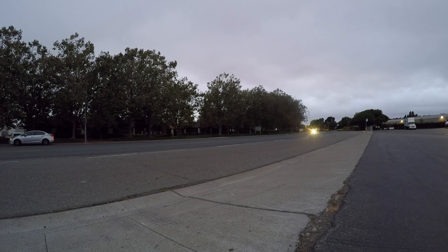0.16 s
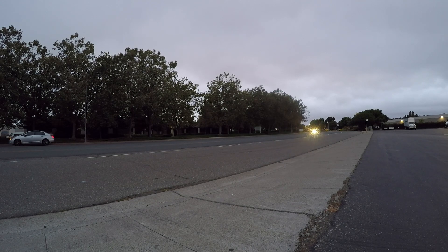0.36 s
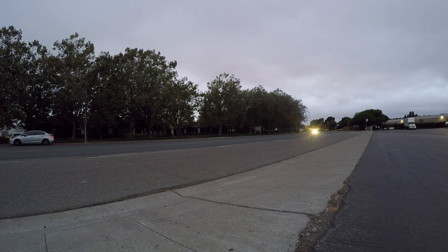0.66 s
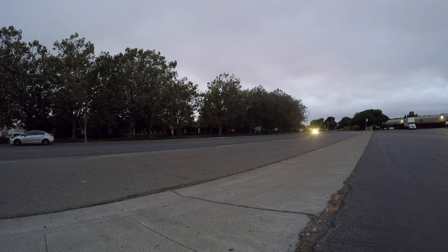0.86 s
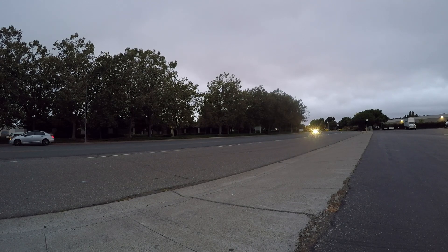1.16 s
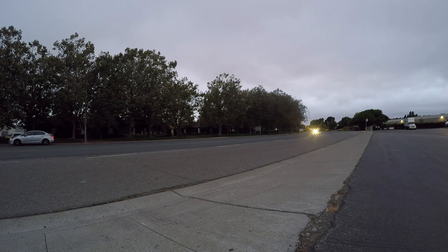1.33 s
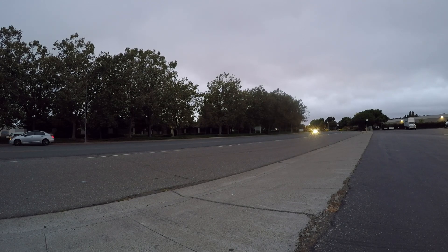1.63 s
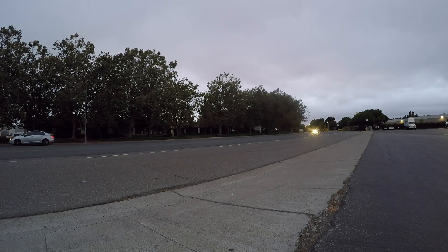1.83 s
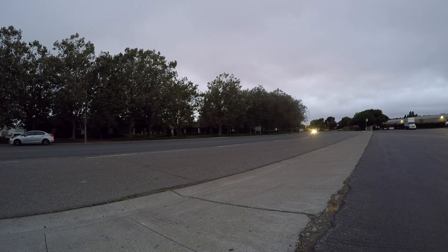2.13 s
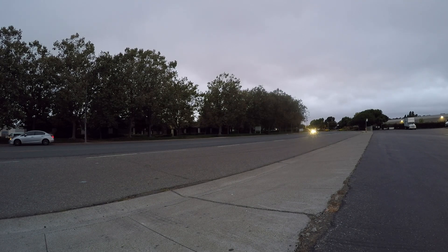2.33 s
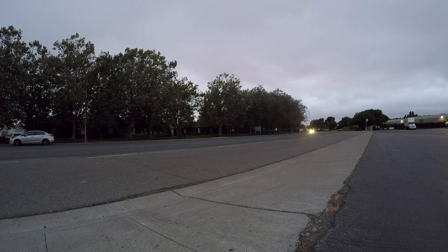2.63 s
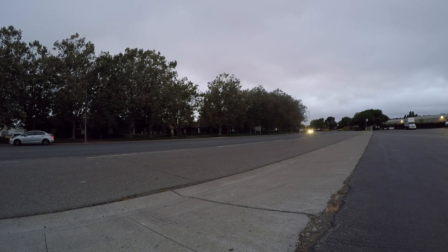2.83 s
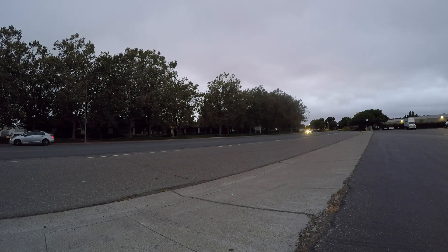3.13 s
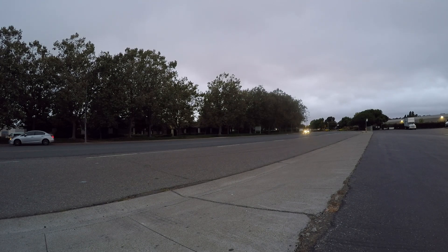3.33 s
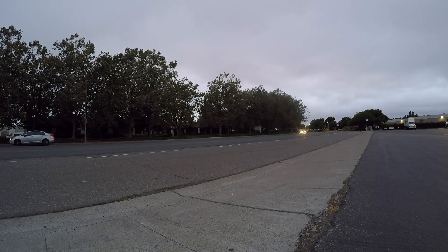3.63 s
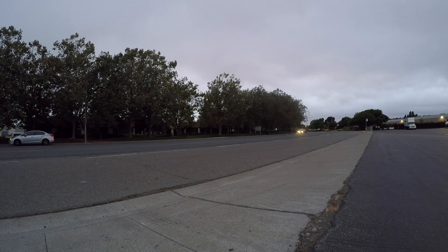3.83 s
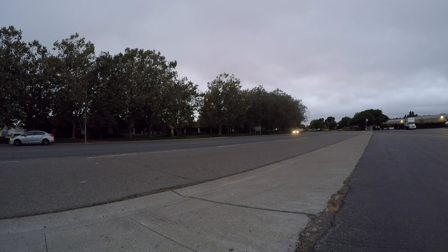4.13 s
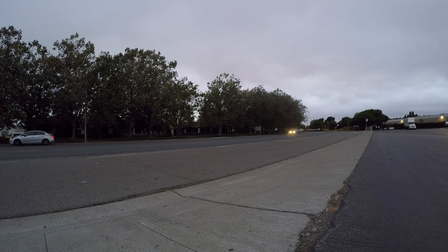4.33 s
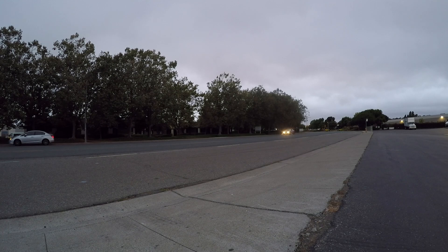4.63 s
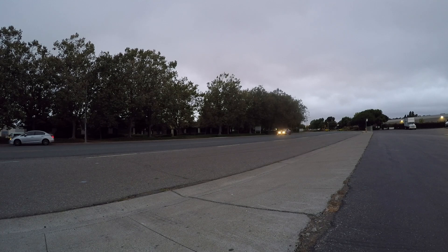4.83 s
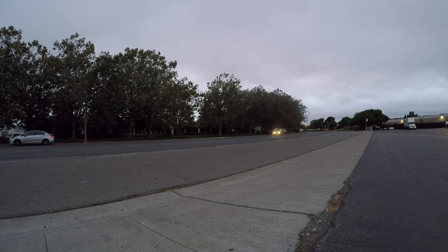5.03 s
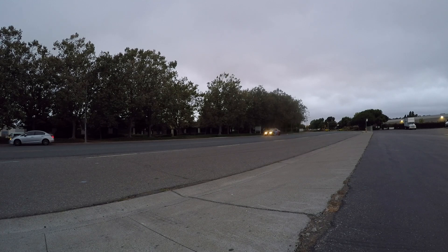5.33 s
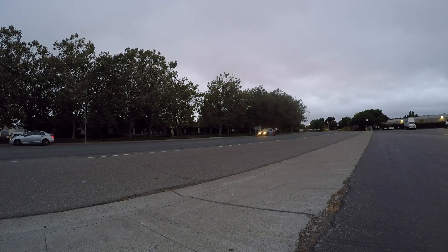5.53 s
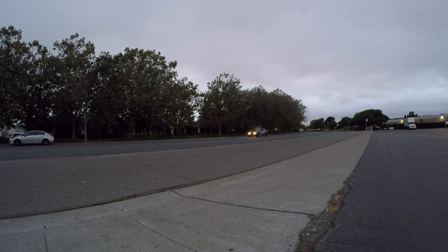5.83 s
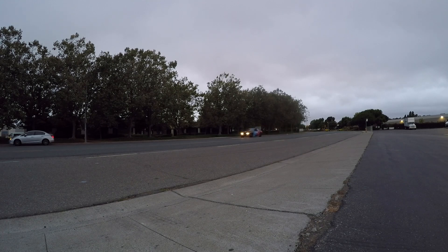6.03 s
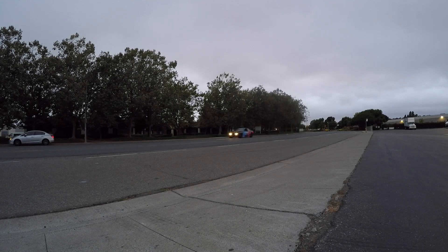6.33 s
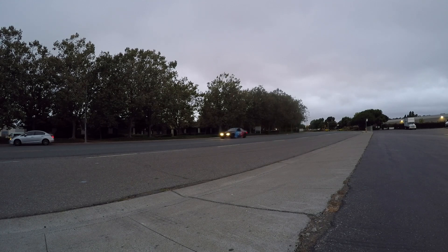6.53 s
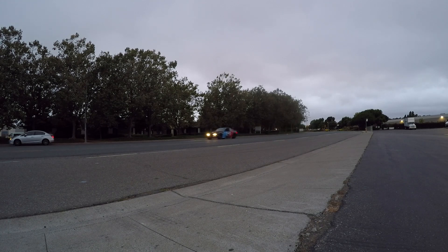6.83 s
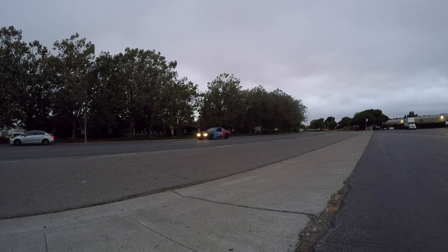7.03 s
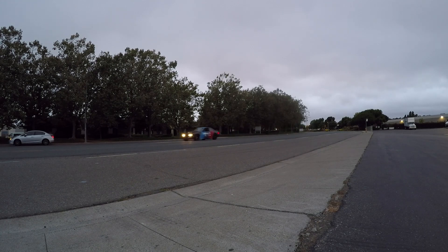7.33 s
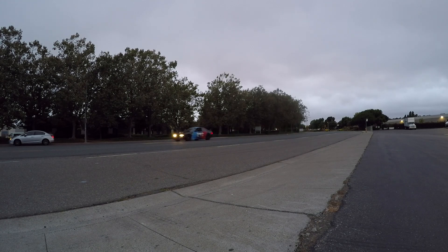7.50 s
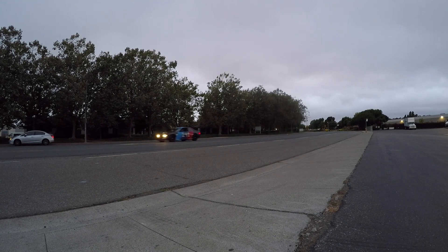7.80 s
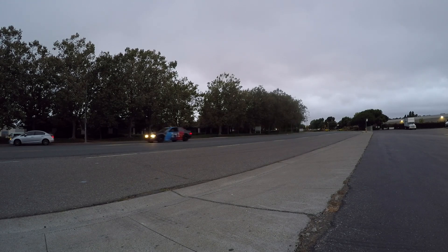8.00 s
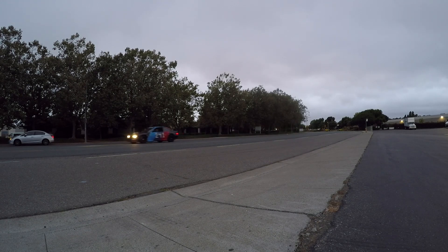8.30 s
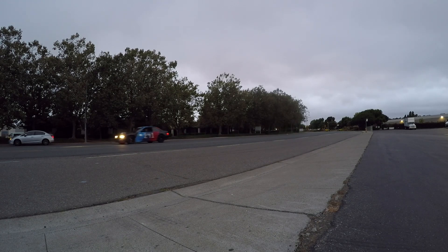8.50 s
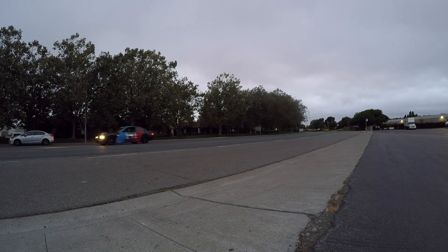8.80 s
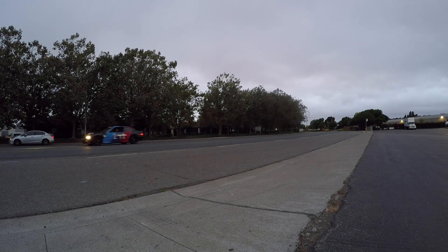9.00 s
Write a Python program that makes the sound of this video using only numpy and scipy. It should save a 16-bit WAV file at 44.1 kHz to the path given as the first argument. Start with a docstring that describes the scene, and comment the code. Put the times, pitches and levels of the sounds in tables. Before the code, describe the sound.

A single outdoor microphone, shaken by low wind gusts, hears a V8 coming nearer while slowing down. At first it is a faint falling hum; a quick rev jumps out, followed by a raspy, hissing overrun. Dry exhaust pops rattle, the engine drops to a lumpy throb, the brake chirps very briefly, and two gruff blips with puffs of gas follow, with a third starting at the end. Far traffic and leaves stay very faint.

```python
"""An eight-cylinder car with a loud exhaust rolls up an open road on the overrun, blips for a lower gear,
crackles, slows further and blips again near idle. The exhaust is a set of tones locked to engine speed plus
noise gated by the firings; pops and puffs ring the pipe, and faint gear and belt whines follow the engine.
The brake squeaks in gliding sine tones: a falling chirp, a held whistle, later a faint peep.
Coloured noise makes the wind rumbling on the microphone and the far traffic and leaves."""
import sys
import numpy as np
from scipy import signal
from scipy.fft import rfft, irfft, next_fast_len
from scipy.io import wavfile

SR = 44100
rng = np.random.default_rng(int(sys.argv[2]) if len(sys.argv) > 2 else 0)


def wav_out(sig):
    """Save sig, one row per channel (or a flat mono array), as 16-bit PCM at SR to the path in sys.argv[1]."""
    wavfile.write(sys.argv[1], SR, np.round(np.clip(np.atleast_2d(sig).T, -1, 1) * 32767).astype(np.int16))


N = 403956


def from_db(db):
    """Decibels to gain."""
    return 10 ** (np.asarray(db) / 20)


def rms_one(x):
    """Scale to rms 1."""
    return x / np.sqrt(np.mean(x ** 2) + 1e-20)


def in_time(rows):
    """Table columns as curves over every sample; the first column is the time in seconds."""
    s, *columns = np.transpose(rows)
    return [np.interp(np.arange(N) / SR, s, column) for column in columns]


def drift(rate_hz):
    """Slow random wander of spread 1, moving about rate_hz times a second."""
    step = 40  # samples between the points of the slow curve
    warm_up = 2000
    r = np.exp(-2 * np.pi * rate_hz * step / SR)
    noise = rng.standard_normal(N // step + 2 + warm_up)
    slow = signal.lfilter([1], [1, -2 * r, r * r], noise)[warm_up:]
    return np.interp(np.arange(N) / step, np.arange(len(slow)), rms_one(slow))


def colour(x, spectrum):
    """Shape a noise by (pitch_hz, level_db) points on a log frequency axis; rms 1."""
    hz, db = np.transpose(spectrum)
    size = next_fast_len(N)
    log_hz = np.log(np.arange(size // 2 + 1) * SR / size + 1)
    gain = from_db(np.interp(log_hz, np.log(hz), db, left=-90, right=-90))
    return rms_one(irfft(rfft(x, size) * gain, size)[:N])


def resonance(x, hz, width_hz):
    """Two-pole resonance with gain 1 on top."""
    r = np.exp(-np.pi * width_hz / SR)
    zeros = np.array([1, 0, -1]) * (1 - r * r) / 2
    poles = [1, -2 * r * np.cos(2 * np.pi * hz / SR), r * r]
    return signal.lfilter(zeros, poles, x + 1e-18)


def double_resonance(x, hz, width_hz):
    """The same resonance twice in a row, for steeper skirts."""
    return resonance(resonance(x, hz, width_hz), hz, width_hz)


def highpass(x, order, hz):
    """High-pass run both ways, so that it shifts no phase."""
    return signal.sosfiltfilt(signal.butter(order, hz, "high", fs=SR, output="sos"), x)


# engine slowing and revving: time_s, cycle_hz (four-stroke cycles; eight firings in each)
ENGINE_SPEED = [(0, 32.1), (0.7, 30.62), (1.5, 27.9), (2.28, 25.5), (2.98, 24.2), (3.09, 23.9),
                (3.27, 32.2), (3.42, 37.3), (3.62, 34.06), (3.85, 28.5), (4.17, 28.6), (4.56, 26.0),
                (5.13, 22.61), (5.5, 20.4), (6.27, 16.1), (6.8, 13.4), (7.4, 11.2), (8.0, 8.55), (8.2, 9.1),
                (8.47, 9.85), (8.85, 9.4), (9.16, 8.9)]


def engine_speed():
    """Cycle rate in Hz, and its running sum in cycles, to which every engine sound is locked."""
    cycle_hz, = in_time(ENGINE_SPEED)
    return cycle_hz, np.cumsum(cycle_hz) / SR


# engine surges (throttle blips, and at 3.4 s the engine dragged by the clutch):
# start_s, noise_peak_s, tone_cut_s, noise_gone_s, firing_tone_db, rasp_lift_db, hiss_lift_db,
# hiss_lag (power of the opening, no unit), tailpipe_bark_db
ENGINE_SURGES = [(3.029, 3.298, 3.34, 3.594, -15.5, 12.5, 17, 4.0, -47),
                 (3.408, 3.545, 3.9, 3.69, -33.5, 9.5, 7.5, 1.2, -51),
                 (4.655, 5.003, 5.5, 5.05, -32, 3.5, 2.5, 0.81, -38.5),
                 (8.007, 8.08, 8.1, 8.33, -17.5, 12, 5.5, 1.8, -32),
                 (8.313, 8.466, 8.68, 8.6, -18, 8.5, 4.5, 1.7, -36),
                 (8.936, 9.098, 12.26, 9.7, -33, 10.5, 6.5, 0.9, -41)]
TONE_SWELL_DB = 44   # the firing tone grows this much while a surge opens
TONE_CUT_DB_PER_S = 233   # and drops away after the cut
UPPER_LATE_DB = 12   # the upper multiples of the firing tone start this much weaker still


def surges():
    """Per surge the opening 0-1 as the noise follows it; overall dB of the firing tone and its upper multiples."""
    t = np.arange(N) / SR
    start, peaks, cut, gone, tone_db = np.array(ENGINE_SURGES)[:, :5].T[..., None]
    rise = np.clip((t - start) / (peaks - start), 0, 1)
    fall = np.clip((gone - t) / (gone - peaks), 0, 1)
    opening = np.minimum(rise, fall)
    tone_db = tone_db - TONE_SWELL_DB * (1 - np.sqrt(rise)) ** 2
    tone_db = tone_db - TONE_CUT_DB_PER_S * np.maximum(t - cut, 0)
    tone_db = np.where(rise > 0, tone_db, -90)
    upper_db = tone_db - UPPER_LATE_DB * (1 - rise) ** 2
    return opening, tone_db.max(axis=0), upper_db.max(axis=0)


# roughness of the firing: time_s, roughness (0-1)
FIRING_ROUGHNESS = [(2.9, .2), (3.05, .17), (3.4, .2), (3.9, .1), (5.1, .09), (5.3, .4), (5.95, .35),
                    (6.2, .2), (7.15, .27), (7.5, .4), (8.0, .25), (8.3, .12), (9.16, .17)]
# tones during the surges: cycle_multiple, level_db (re the firing tone)
SURGE_TONES = [(6, -18), (7, -12), (8, 0.5), (9, -17), (12, -19), (16, -8), (24, -11), (28, -18), (32, -16)]
# tones on the overrun: cycle_multiple, level_db (re the tone level)
SHUT_TONES = [(6, 0), (7, -8), (8, 1.5), (9, -11.5), (10, 0.5), (11, -13.5), (12, -7.5), (14, 3.5),
              (16, -5.5), (18, -6), (20, -3.5), (22, -4), (24, -7.5), (28, -14), (32, -25)]
# what the silencer passes of an overrun tone: pitch_hz, gain_db
SILENCER_PASS = [(90, -36.5), (145, -0.5), (190, 2), (220, -5), (255, 0.5), (285, -6), (315, -3),
                 (350, -9.5), (400, -3.5), (480, -7.5), (600, -11), (800, -14)]
# second and third multiples of the firing tone as engine speed changes: cycle_hz, second_db, third_db
UPPER_MULTIPLES = [(8.8, 12.5, 9), (11.7, 9, 2), (12.37, 9.5, 15), (14.3, 12.5, 10), (15.55, 12, 14),
                   (17.6, 3.5, -2), (24, -6.5, -14), (38, 2, -7)]
# shifting balance of the overrun tones: time_s, odd_db, even_db (even: multiples 14, 18 and 20)
TONE_BALANCE = [(3.0, -3, -0.5), (3.5, 3.5, -2), (4.0, 5, -1.5), (4.25, 1, -0.5), (4.5, -5, -3),
                (4.85, -7, -4.5), (5.3, 5, -8), (6.0, 1, -1.5), (6.4, 5, -11), (6.8, 11.5, -3.5),
                (9.16, -5, 3.5)]
# surge tones above the second firing multiple fade as the cycle rate lies below EDGE_FULL_HZ
EDGE_DB_PER_HZ, EDGE_FULL_HZ = 0.5, 33


def pipe_tones(cycle_hz, turns, overrun_db, firing_db, upper_db):
    """Multiples of the cycle rate; rough firing makes each waver in level and phase."""
    rough, = in_time(FIRING_ROUGHNESS)
    pass_hz, pass_db = np.transpose(SILENCER_PASS)
    surge_levels = {round(k): db for k, db in SURGE_TONES}
    upper = np.transpose(UPPER_MULTIPLES)
    edge_db = EDGE_DB_PER_HZ * np.minimum(cycle_hz - EDGE_FULL_HZ, 0)
    odd_db, even_db = in_time(TONE_BALANCE)
    shared_wander = rough * 1.2 * drift(10)   # phase of the firing tone, scaled to each multiple
    out = 0
    for k, db in SHUT_TONES:
        k = round(k)
        passed_db = np.interp(np.log(k * cycle_hz), np.log(pass_hz), pass_db)
        gain = from_db(overrun_db + db + passed_db)
        if k in (16, 24):
            gain = gain * from_db(np.interp(cycle_hz, upper[0], upper[k // 8 - 1]))
        gain = gain * from_db(odd_db * (k % 2) + even_db * (k in (14, 18, 20)))
        if k in surge_levels:
            drive_db = upper_db if k > 9 else firing_db
            gain = gain + from_db(drive_db + surge_levels[k] + edge_db * (k > 16))
        phase = 2 * np.pi * k * turns + rough * 1.5 * drift(10) + shared_wander * k / 8
        # multiples of the firing tone start in phase, the rest anywhere
        start = 2 * np.pi * rng.random() * (k % 8 > 0)
        out = out + gain * from_db(rough * 9.0 * drift(8)) * np.sqrt(2) * np.cos(phase + start)
    return out


# exhaust with the throttle shut, before surges and shaping: time_s, tones_db, roar_db, rasp_db, hiss_db
SHUT_EXHAUST = [(0, -43.5, -36.5, -40.5, -66), (1.2, -41.5, -44, -39, -64.5), (2.4, -40, -37, -40.5, -58),
                (2.75, -39.5, -50, -38.5, -54.5), (3.03, -44, -30, -42.5, -54),
                (3.09, -40, -27, -31, -45.5), (3.6, -21.5, -40, -31.5, -36),
                (3.85, -34.5, -28.5, -30, -41.5), (4.1, -28, -24.5, -30, -42.5),
                (4.4, -28, -29.5, -33.5, -44.5), (5.1, -27, -30, -32.5, -37.5),
                (5.22, -39, -29, -32.5, -44), (5.4, -33, -36, -31, -42), (5.7, -27, -20.5, -30, -42.5),
                (6, -31.5, -32, -34, -43), (6.35, -30, -25, -31.5, -42.5), (6.7, -36, -25.5, -36.5, -45.5),
                (6.92, -29.5, -26.5, -37.5, -46.5), (7.12, -31, -30, -40, -47),
                (7.4, -33.5, -26, -36, -44.5), (7.63, -40, -34.5, -43, -52.5),
                (7.9, -35.5, -28, -36, -45.5), (8.3, -33.5, -30, -36, -48.5), (8.7, -37, -29, -37.5, -48.5),
                (9.16, -35.5, -35.5, -40.5, -53.5)]
ROAR_LIFT = 0.78   # the roar takes this share of the rasp's lift in dB
ROAR_POWER = 1   # power of the opening; 1 makes roar, rasp and bark rise evenly with it
HISS_HOLD = 1.11   # the hiss is full before the opening is, and so holds its top
HISS_FALL = 1.28   # power of the closing


def exhaust_levels(opening):
    """Tone level in dB and the gains of roar, rasp, bark and hiss; each surge lifts the gains."""
    tone_db, roar_db, rasp_db, hiss_db = in_time(SHUT_EXHAUST)
    rasp_lift_db, hiss_lift_db, hiss_lag, bark_db = np.array(ENGINE_SURGES)[:, 5:].T[..., None]
    low_opening = opening ** ROAR_POWER
    low_db = (rasp_lift_db * low_opening).max(axis=0)
    hiss_power = np.where(np.gradient(opening, axis=1) > 0, hiss_lag, HISS_FALL)
    hiss_opening = np.minimum(HISS_HOLD * opening, 1) ** hiss_power
    high_db = (hiss_lift_db * hiss_opening).max(axis=0)
    bark = (from_db(bark_db) * low_opening).sum(axis=0)
    roar = from_db(roar_db + ROAR_LIFT * low_db)
    return tone_db, (roar, from_db(rasp_db + low_db), bark, from_db(hiss_db + high_db))


# tailpipe resonances: pitch_hz, width_hz (of each of two passes), level_db
TAILPIPE_MODES = [(913, 91, 0), (1134, 117, 4)]


def tailpipe_ring(x):
    """Noise ringing in the tailpipe: steep resonances side by side; rms 1."""
    return rms_one(sum(from_db(db) * double_resonance(x, hz, width) for hz, width, db in TAILPIPE_MODES))


# uneven strength of the eight firings in a cycle: level_db
CYLINDER_STRENGTH = [0, -4, -1, -6, 1, -3, -5, -2]
# spectra of the low roar, the middle rasp and the high hiss: pitch_hz, level_db (per Hz)
ROAR_COLOUR = [(90, 4), (125, -23.5), (160, 6), (200, 6.5), (270, -1.5), (310, 0.5), (350, -4), (450, -9.5),
               (700, -12)]
RASP_COLOUR = [(240, -44), (400, 6), (494, -1), (605, -3.5), (785, 0), (1300, -4), (1550, -14), (3000, -25),
               (3900, -39), (6600, -120)]
HISS_COLOUR = [(1290, -2), (2200, -1.5), (2780, -0.5), (3210, -5), (4020, -6), (5600, -9), (6210, -9),
               (7540, -11.5), (9830, -19.5), (15100, -22.5)]
# changing brightness of the hiss and strength of its narrow whistle:
# time_s, treble_db (gain of the hiss above TREBLE_HZ), whistle_db (re the hiss)
TREBLE_AND_WHISTLE = [(0, 9, -13), (2.9, -5, -9), (3.2, -16, -25), (3.33, -12, -12), (3.55, -40, -16),
                      (4, -20, -9.5), (4.25, -18, -7), (4.35, -16, -11), (4.65, -6, -8), (4.75, -5, -6),
                      (5.1, -5.5, -7), (5.6, -4.5, -14), (6.5, -1.5, -46), (8.05, 2.5, -18),
                      (9.16, 5.5, -32)]
# the rasp's upper part grows duller or brighter over time: time_s, upper_db (gain above RASP_EDGE_HZ)
RASP_BRIGHTNESS = [(3, 2), (6.5, -3), (7.5, 1), (8.2, -7.5), (9.16, -2.5)]
RASP_EDGE_HZ, TREBLE_HZ = 1300, 8500
WHISTLE_HZ, WHISTLE_WIDTH_HZ = 5500, 480
SURGE_DEPTH = 0.17   # the bursts stand further apart during a surge


def exhaust_noise(turns, gains, opening, depth=0.13, sharp=1.17, scatter_db=5.5):
    """Turbulence let out in a burst at each firing, uneven from cylinder to cylinder."""
    roar_gain, rasp_gain, bark_gain, hiss_gain = gains
    treble_db, whistle_db = in_time(TREBLE_AND_WHISTLE)
    rasp_upper_db, = in_time(RASP_BRIGHTNESS)

    # every firing starts a burst that decays until the next
    firing = (8 * turns).astype(int)
    scatter = scatter_db * np.clip(rng.standard_normal(3000), -1.5, 1.5)
    strength_db = np.array(CYLINDER_STRENGTH)[firing % 8] + scatter[firing]
    burst = sharp * from_db(strength_db) * np.exp(-sharp * (8 * turns % 1))
    share = np.clip(depth + SURGE_DEPTH * opening, 0, 1)
    gate = 1 - share + share * burst

    white = rng.standard_normal((3, N))
    roar = roar_gain * from_db(1.6 * drift(7)) * colour(white[0] * np.sqrt(gate), ROAR_COLOUR)

    bark = bark_gain * tailpipe_ring(white[0] * gate ** 2)
    rasp = rasp_gain * from_db(1.26 * drift(22.0)) * colour(white[1] * gate, RASP_COLOUR) + bark
    rasp = rasp + (from_db(rasp_upper_db) - 1) * highpass(rasp, 2, RASP_EDGE_HZ)

    narrow = resonance(white[1], WHISTLE_HZ, WHISTLE_WIDTH_HZ)
    narrow = resonance(narrow, WHISTLE_HZ, 2 * WHISTLE_WIDTH_HZ)
    whistle = from_db(whistle_db + 1.7 * drift(29) + 1.7 * drift(6.6)) * rms_one(narrow)
    hiss = colour(white[2] * gate, HISS_COLOUR) + whistle
    hiss = hiss_gain * from_db(0.93 * drift(17.0)) * hiss
    hiss = hiss + (from_db(treble_db) - 1) * highpass(hiss, 1, TREBLE_HZ)
    return roar + rasp + hiss


# overrun pops: start_s, crack_db (drive, before 12 dB of gain and the pipe), thump_db (peak)
OVERRUN_POPS = [(2.75, -32, -17), (5.367, -9.5, -7), (5.457, -13.5, -19), (5.523, -29, -23),
                (5.556, -31, -13.5), (5.585, -11, -9.5), (5.642, -9, -19), (5.707, -14, -12),
                (5.733, -14, -8), (5.848, -16, -21), (5.92, -24, -14), (6.14, -15, -26), (6.294, -28, -9),
                (6.493, -29, -13), (6.889, -29, -14), (6.971, -30, -18), (7.814, -32, -23)]
# pipe resonances that colour the cracks: pitch_hz, width_hz, level_db
PIPE_MODES = [(200, 100, 0), (380, 250, -4), (800, 500, -3), (1250, 400, -5), (2500, 1200, -16)]
THUMP_HZ, THUMP_WIDTH_HZ = 241, 140   # the silencer booms with each pop


def pops():
    """Unburnt fuel bangs: a short noisy crack through the pipe resonances and a thump of the silencer."""
    cracks, thumps = np.zeros((2, N))
    for s, crack_db, thump_db in OVERRUN_POPS:
        at = round(s * SR)
        cracks[at] = from_db(crack_db + 12)
        thumps[at] = from_db(thump_db)
    burst = signal.lfilter([1], [1, -.9], cracks) * (1 + .25 * rng.standard_normal(N))
    burst = signal.sosfilt(signal.butter(2, 2200, fs=SR, output="sos"), burst + 1e-18)
    # undo what the double resonance takes from the peak of a click
    peak_gain = np.e * SR / (2 * np.pi * THUMP_WIDTH_HZ)
    boom = double_resonance(thumps, THUMP_HZ, THUMP_WIDTH_HZ) * peak_gain
    crack = 0
    for k, (hz, width, db) in enumerate(PIPE_MODES):
        crack = crack + (-1) ** k * from_db(db) * resonance(burst, hz, width)   # alternating sign
    return crack - boom


# puffs of gas at low speed, levels before the decay: start_s (of the bark), hiss_db, bark_db
GAS_PUFFS = [(8.03, -42.5, -28), (8.066, -47, -18.5), (8.090, -38.5, -27), (8.13, -43, -16.5),
             (8.188, -46, -32), (8.232, -45.5, -28), (8.268, -47, -24.5), (8.312, -48, -30),
             (8.412, -43.5, -22), (8.448, -51, -35), (8.503, -44.5, -37), (9.042, -47, -27),
             (9.071, -51, -26), (9.11, -44.5, -30)]
# spectrum of the puff hiss: pitch_hz, level_db (per Hz)
PUFF_HISS_COLOUR = [(2500, -16), (4500, 0.5), (7000, 1.5), (10000, -5.5), (15100, -10)]
PUFF_T60_S, BARK_T60_S = 0.17, 0.067   # time to fall by 60 dB
HISS_SPREAD_S = 0.011   # the bright noise is smeared about 11 ms before each bark


def puffs():
    """Bright noise and a bark of the tailpipe that start quickly and die within tens of milliseconds."""
    t, hiss, bark = np.arange(N) / SR, 0, 0
    for s, hiss_db, bark_db in GAS_PUFFS:
        bark_age = np.maximum(t - s, 0)
        hiss_age = np.maximum(t - s + HISS_SPREAD_S, 0)
        hiss_decay = from_db(hiss_db - 60 * (hiss_age / PUFF_T60_S) ** 1.4)
        hiss = hiss + hiss_decay * np.minimum(hiss_age / 0.012, 1)   # 12 ms attack
        bark_decay = from_db(bark_db - 60 * bark_age / BARK_T60_S)
        bark = bark + bark_decay * np.minimum(bark_age / 0.0055, 1)   # 5.5 ms attack
    white = rng.standard_normal((2, N))
    bright = from_db(2.1 * drift(60)) * colour(white[0], PUFF_HISS_COLOUR)
    return hiss * bright + bark * tailpipe_ring(white[1])


# faint gear and belt whines: cycle_multiple, start_s, end_s, level_db (rms at the height of the swell)
GEAR_BELT_WHINES = [(144, 3.8, 4.7, -60), (276, 4.45, 5.1, -65), (234, 5.2, 6.15, -57)]


def whines(turns):
    """Thin tones locked to engine speed that swell and fade."""
    t, out = np.arange(N) / SR, 0
    for k, start, end, db in GEAR_BELT_WHINES:
        progress = np.clip((t - start) / (end - start), 0, 1)
        swell = np.sqrt(np.sin(np.pi * progress).clip(0))
        tone = np.sqrt(2) * np.sin(2 * np.pi * k * turns + 1.5 * drift(25))
        out = out + swell * from_db(db + 2.3 * drift(8)) * tone
    return out


# brake squeak as a falling chirp, a held whistle and a faint peep, each with rows of:
# time_s, pitch_hz, level_db (before 3.5 dB of gain)
BRAKE_SQUEAK = [
    [(7.928, 11900, -58), (7.935, 11600, -46), (7.939, 11120, -36), (7.946, 10700, -41),
     (7.953, 10600, -40), (7.955, 10150, -50), (7.959, 10020, -40), (7.972, 9600, -58)],
    [(7.955, 11100, -66), (7.97, 11120, -54), (7.995, 11080, -56), (8.005, 11050, -62), (8.02, 11050, -59),
     (8.07, 11000, -62)],
    [(8.602, 13000, -66), (8.615, 13100, -58), (8.635, 13300, -64)],
]


def squeak():
    """Slightly unsteady whistles from pad on disc."""
    t, out = np.arange(N) / SR, 0
    for rows in BRAKE_SQUEAK:
        hz, db = in_time(rows)
        on = (t > rows[0][0]) & (t < rows[-1][0])
        gain = from_db(db + 3.5 + 2.0 * drift(150))
        out = out + on * gain * np.sin(2 * np.pi * np.cumsum(hz) / SR + 0.81 * drift(250))
    return out


# gusts on the microphone, before a small random drift: time_s, level_db (rms)
WIND_GUSTS = [(0.0, -21), (0.69, -20), (0.92, -14), (1.45, -30), (1.68, -17), (2.78, -15.5), (2.88, -33),
              (3.59, -12), (3.75, -32), (3.8, -17), (4.67, -30), (5.15, -12), (5.28, -24), (5.94, -19.5),
              (6.02, -34), (6.1, -18.5), (6.94, -29.5), (7.27, -26), (7.35, -10), (7.75, -21.5),
              (8.24, -16), (8.9, -29), (9.16, -18)]
# spectrum of the wind rumble: pitch_hz, level_db (per Hz)
WIND_SPECTRUM = [(7.1, -54), (12, 4), (51, 2.5), (139, -15.5), (195, -22), (226, -60), (258, -23),
                 (400, -34.5), (520, -40), (880, -120)]


def wind():
    """Lumpy low noise: eddies buffet the microphone port."""
    level_db, = in_time(WIND_GUSTS)
    return from_db(level_db + drift(6.2)) * colour(rng.standard_normal(N), WIND_SPECTRUM)


# spectrum of far traffic and leaves: pitch_hz, level_db (per Hz)
DISTANT_COLOUR = [(88, -34), (150, -19), (178, -11), (278, -22), (546, -13.5), (1230, -9.5), (1990, -27),
                  (5520, -31), (15100, -58)]


def distance():
    """Far traffic and leaves blend into one steady coloured noise."""
    return from_db(-48) * colour(rng.standard_normal(N), DISTANT_COLOUR)


def scene():
    """Car, wind and far background in one channel."""
    cycle_hz, turns = engine_speed()
    opening, firing_db, upper_db = surges()
    overrun_db, noise_gains = exhaust_levels(opening)
    engine = pipe_tones(cycle_hz, turns, overrun_db, firing_db, upper_db) + whines(turns)
    gas = exhaust_noise(turns, noise_gains, opening.max(axis=0))
    return (engine + gas + pops() + puffs() + squeak() + wind() + distance())[None]


def record(dry):
    """Peaks are rounded, the top is cut; the filter is already settled at the start."""
    ceiling, cutoff_hz = .85, 15250
    rounded = ceiling * np.tanh(dry / ceiling)
    cut = signal.ellip(12, .5, 40, cutoff_hz, fs=SR, output="sos")
    settled = signal.sosfilt_zi(cut)[:, None] * rounded[0, 0]
    return signal.sosfilt(cut, rounded, zi=settled)[0]


dry = scene()
out = record(dry)
wav_out(out)
```